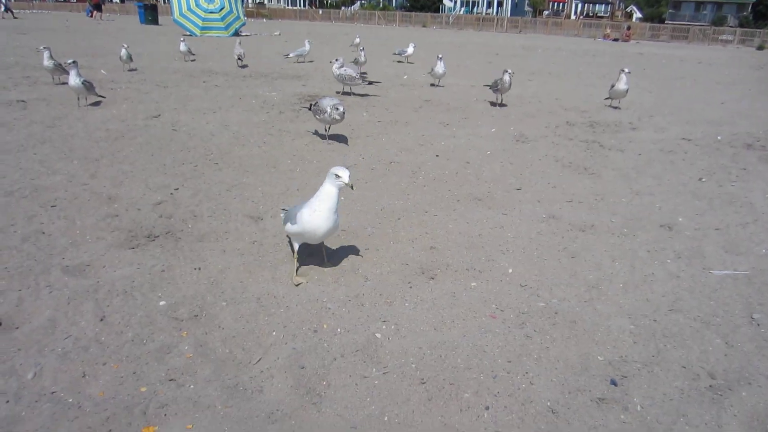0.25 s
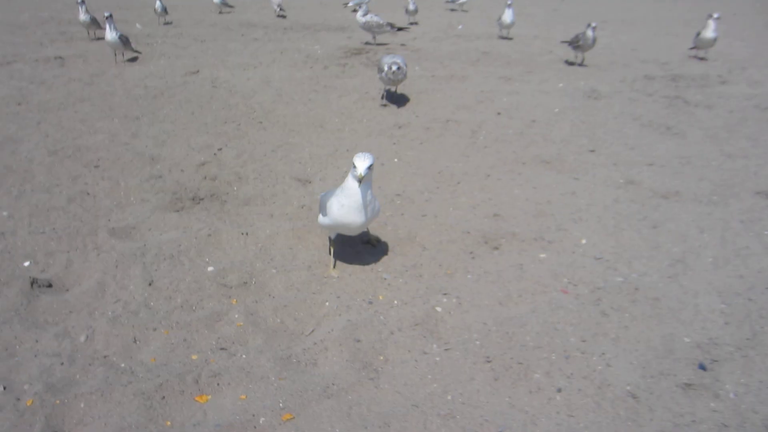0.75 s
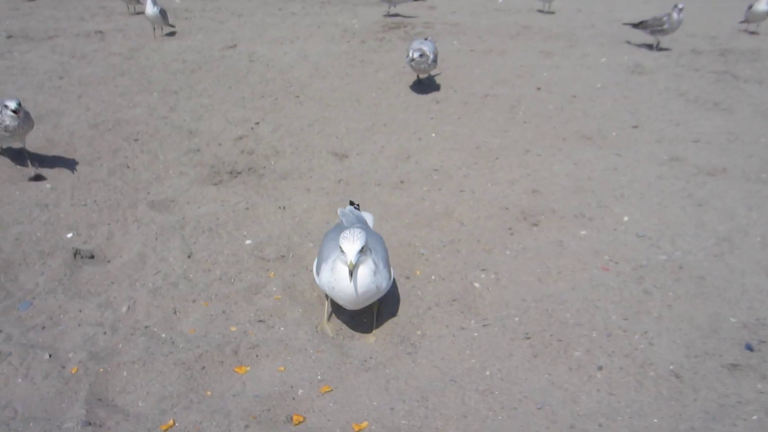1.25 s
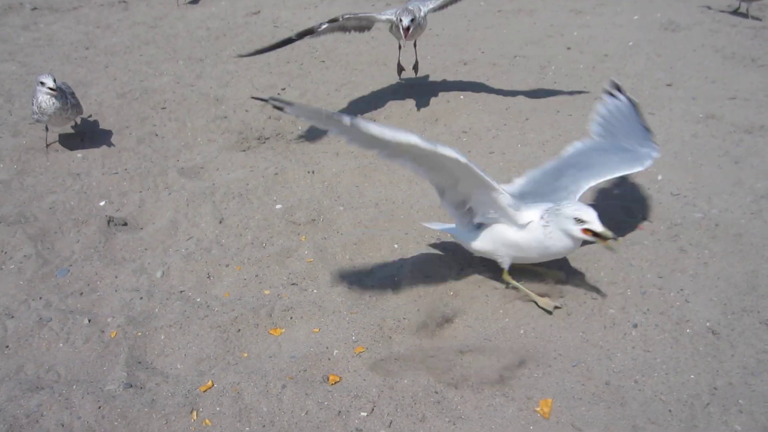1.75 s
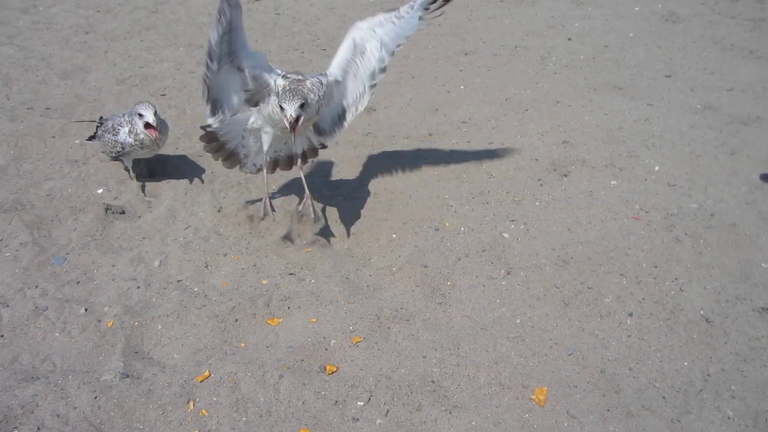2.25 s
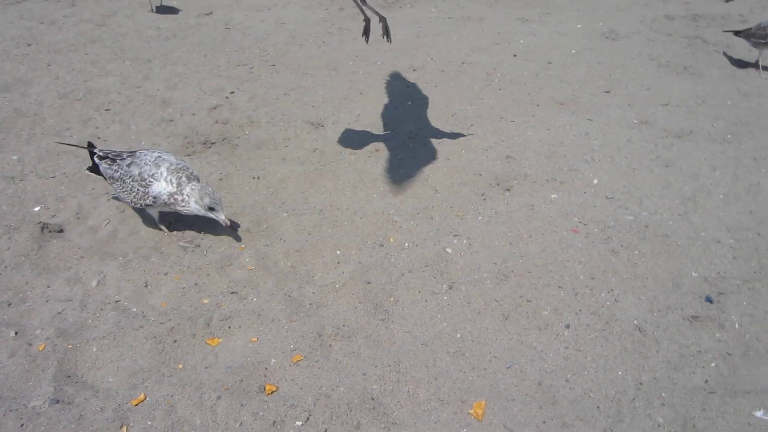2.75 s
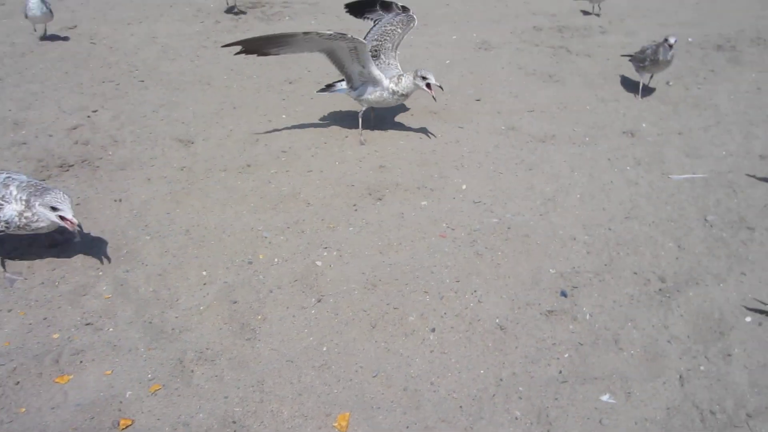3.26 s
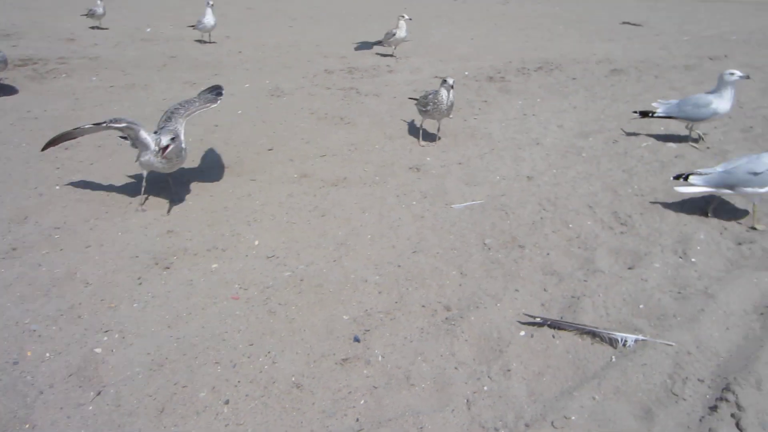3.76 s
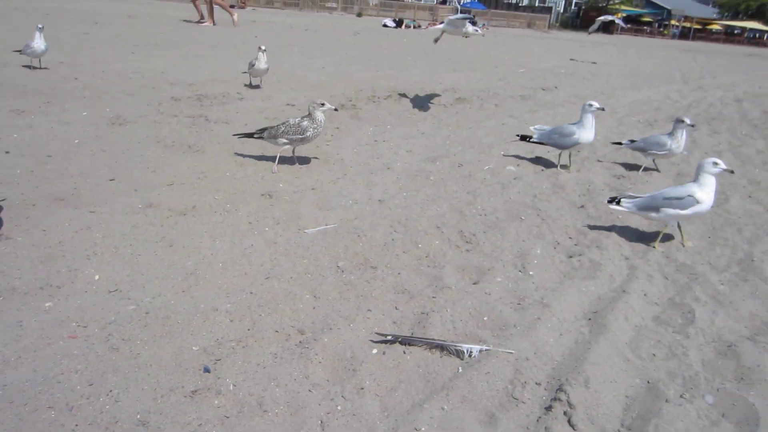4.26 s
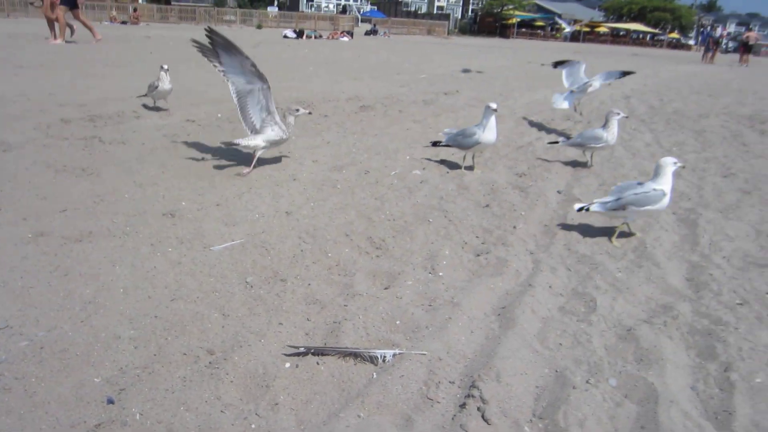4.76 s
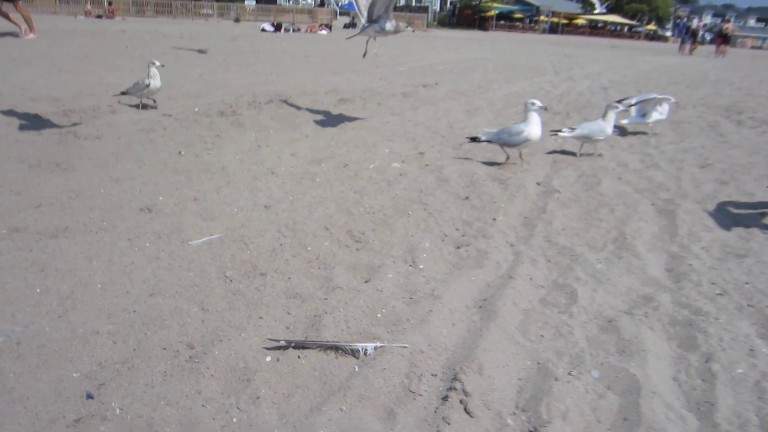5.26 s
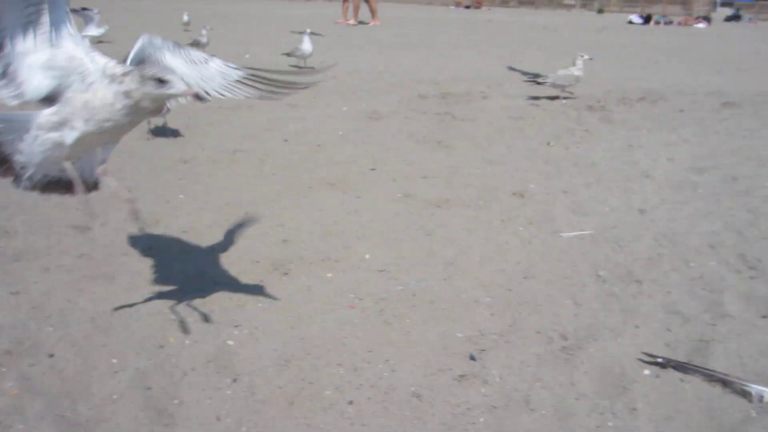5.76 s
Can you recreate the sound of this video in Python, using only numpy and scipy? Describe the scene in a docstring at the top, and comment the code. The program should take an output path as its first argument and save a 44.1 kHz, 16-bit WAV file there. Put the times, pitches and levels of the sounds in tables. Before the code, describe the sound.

Piercing, overlapping gull cries and raspy cackles grow louder over wind buffeting, a faint beach wash and a few sharp ticks.

```python
"""Wind thumps and flutters on the microphone over a faint beach wash, while gulls squabble close by.
Their thin squeals are two whistling membranes that crack between registers, often in overlapping cries.
Harsh rasps are uneven slaps and puffs of air through a throat colour; the wind is lumpy filtered noise.
A few sharp ticks, short decaying noise bursts, fall among the cries."""
import sys
import numpy as np
from scipy import signal
from scipy.fft import rfft, irfft, next_fast_len
from scipy.io import wavfile
from scipy.ndimage import uniform_filter1d

SR = 44100
rng = np.random.default_rng(int(sys.argv[2]) if len(sys.argv) > 2 else 0)


def store_wav(level_fs):
    """Save 16-bit WAV to argv[1]."""
    pcm = np.round(np.clip(np.atleast_2d(level_fs), -1, 1) * 32767)
    wavfile.write(sys.argv[1], SR, pcm.T.astype(np.int16))


N = 265261
TIME = np.arange(N) / SR  # s

# Levels in the tables are relative: each layer has its own trim. Left-right is positive towards the left.
# colour of the low and the middle part of the wind: (frequency [Hz], level [dB])
RUMBLE_COLOUR = [(8.8, -26), (15, -15), (70, -1.5), (135, -1), (193, -1.5), (300, -8.5), (390, -23),
                 (660, -120)]
FLUTTER_COLOUR = [(100, -48.5), (220, -11), (330, 3.5), (450, -0.5), (700, -8.5), (1000, -16.5),
                  (1600, -32), (3000, -45), (8000, -73)]
# the breeze between gusts: (time [s], level [dB])
BREEZE = [(0, -22), (.9, -24), (1.2, -28), (2.3, -24), (2.75, -42), (3.2, -33), (3.5, -41), (3.7, -50),
          (3.95, -36), (4.3, -36), (4.7, -30), (5.38, -39), (5.6, -26), (6, -21)]
# separate gusts on the microphone: (time [s], half width [s], rumble level [dB], flutter level [dB])
GUSTS = [(.01, .03, -24, -21), (.165, .04, -15, -21), (.285, .025, -14, -27), (.58, .06, -14, -22),
         (.69, .04, -14, -21), (.85, .025, -16, -26), (.98, .04, -17, -30), (1.41, .035, -12, -30),
         (1.89, .06, -16, -20), (2.01, .05, -20, -27), (2.15, .07, -22, -32), (2.62, .035, -23, -27),
         (2.92, .04, -25, -37), (3.16, .04, -21, -31), (3.375, .012, -21, -36), (3.795, .03, -20, -23),
         (4.11, .035, -21, -30), (4.46, .03, -20, -36), (4.59, .02, -24, -42), (4.79, .06, -19, -24),
         (5.21, .05, -22, -26), (5.51, .04, -23, -31), (5.66, .045, -16, -15), (5.85, .05, -15, -20)]
# pressure thumps of wind: (time [s], peak level [dB], push time [ms], left-right [dB])
BUFFETS = [(.016, -16, .5, -6), (.128, -11, .5, -6), (.168, -15, .5, -6), (.286, -14, 3.5, -6),
           (.447, -15, .5, -6), (.577, -11, .6, -6), (.607, -13, .7, -6), (.661, -17, .4, -6),
           (.702, -15, .6, -6), (.86, -16, .6, -6), (1.405, -7, 1.6, -6), (1.876, -2, .5, -5),
           (1.998, -9, .5, -6), (3.381, -7, 1.1, 4), (3.818, -14, .5, 4), (4.115, -17, .5, 2),
           (4.389, -8, .5, -6), (4.971, -10, .5, -1), (5.168, -8, .6, -3), (5.644, -8, .45, -2),
           (5.678, -8, .6, 0), (5.842, -11, .5, -3), (5.87, -11, .5, -6)]
# colour of the beach wash: (frequency [Hz], level [dB])
BEACH_COLOUR = [(30, -12.5), (150, 2.5), (400, -0.5), (1000, -13), (2500, -18.5), (4000, -30.5),
                (6500, -31.5), (9000, -42.5), (12000, -64.5), (16000, -73.5)]
# harsh stretches, where the membranes slap shut: (start [s], end [s], slap rate [per s], unevenness [0-1],
# first level [dB], last level [dB], left-right [dB], throat opening [0-1])
RASPS = [(0, .26, 330, .8, -49, -53, -7, .15), (.56, 1.03, 330, .8, -44, -46, -9, .15),
         (1.03, 1.17, 530, .3, -39, -40, -10, 1), (1.17, 1.33, 515, .12, -44, -53, -10, .9),
         (2.05, 2.21, 300, .7, -42, -39, -12, .6), (2.21, 2.44, 420, .3, -32, -33, -13, 1),
         (2.44, 2.61, 330, .5, -38, -44, -13, 1), (2.645, 2.7, 640, .12, -44, -46, -12, .7),
         (2.92, 2.985, 460, .3, -42, -45, -14, .8), (3.14, 3.44, 330, .5, -51, -49, -14, .3),
         (3.65, 3.76, 340, .2, -53, -49, 0, .2), (3.76, 3.81, 410, .25, -47, -43, 3, .8),
         (4.373, 4.44, 330, .3, -36, -33, 4, 1), (4.44, 4.52, 300, .5, -33, -35, 4, 1),
         (4.52, 4.77, 300, .5, -40, -36, 3, .7), (4.77, 4.865, 330, .45, -30, -26, 4, 1),
         (5.155, 5.188, 378, .15, -28, -24, 2, 1), (5.22, 5.245, 330, .7, -40, -52, 4, .7),
         (5.29, 5.4, 330, .6, -47, -54, 4, .3)]
# throat colour of the rasp at full cry, and half closed: (frequency [Hz], level [dB])
OPEN_THROAT = [(500, -24), (1000, -11), (1450, -30), (2050, -7), (2700, 2.5), (4100, -8.5), (5500, 1),
               (7000, -19.5), (8000, -14.5), (9500, -47.5), (11800, -54), (16000, -46)]
SOFT_THROAT = [(700, -17.5), (1600, -11), (2200, 6), (3000, -11), (4200, -32.5), (5600, -16.5),
               (7500, -9.5), (10000, -37), (16000, -39.5)]
# placing and timbre by voice name: (left-right [dB], left lead [ms], overtone strength [dB],
# second membrane's pitch [share of the first], second membrane's level [dB]);
# the key "far" stands for a side tone: a thin, mostly high tone sounding along with the cries
VOICES = {"thin": (-6.5, .112, 0, .56, -17), "stammer": (-8, .16, -1, .72, -22),
          "squawk": (-7, .18, 8.5, .5, -4), "lead": (-9, .16, 1, .75, -38),
          "cackle": (-8.5, .18, 4, .56, -20.5), "whistle": (-10.5, .076, 6, .5, -32),
          "answer": (-8, .19, 4, .7, -24), "long": (-2, .023, 4.5, .58, -27),
          "under": (-2, .018, 7.5, .6, -30), "scream": (-.5, .01, -1, .7, -19),
          "torn": (-5.5, .025, 2.5, .55, -11.5), "wail": (-1.5, .035, -2, .62, -38),
          "steady": (-7.5, -.02, 5, .5, -20), "loud": (-2, .033, 0, .55, -35),
          "trailing": (-1, 0, 3.5, .52, -17), "mew": (-1, 0, 5.5, .76, -26), "far": (-6, .1, 0, .5, -25)}
# held notes of the high register: (voice [name], start [s], end [s], first, middle and last pitch [Hz],
# first level [dB], last level [dB], roughness [0-1], warble [0-1]); "far" is the side tone here too
SQUEALS = [("thin", .003, .279, 3530, 3490, 3460, -45, -47, .02, 0),
           ("stammer", .535, .595, 3280, 3380, 3250, -35, -39, .2, 0),
           ("stammer", .595, .73, 4200, 4050, 3900, -64, -50, .2, 0),
           ("stammer", .73, 1.008, 3900, 3780, 3680, -38, -38, .08, .4),
           ("squawk", 1.02, 1.26, 2150, 2140, 2000, -37, -36, .2, 0),
           ("squawk", 1.26, 1.37, 2100, 1900, 1520, -41, -54, .35, 0),
           ("lead", 1.683, 1.868, 3540, 3170, 3350, -22, -18, .02, 0),
           ("lead", 1.868, 1.989, 4350, 4400, 4660, -28, -26, .05, 0),
           ("lead", 1.989, 2.16, 3540, 3350, 3720, -22, -19, .05, .3),
           ("cackle", 2.044, 2.574, 3920, 4020, 3960, -24, -27, .24, .7),
           ("lead", 2.16, 2.204, 3810, 3830, 3900, -19, -18, .02, 0),
           ("whistle", 2.769, 2.829, 3380, 3320, 3400, -35, -32, .03, 0),
           ("whistle", 2.829, 2.993, 4335, 4290, 4260, -26, -23, .03, 0),
           ("answer", 2.99, 3.13, 3350, 3600, 3390, -32, -30, .03, 0),
           ("whistle", 2.993, 3.148, 4240, 4100, 4040, -22.5, -25, .03, 1),
           ("far", 3.1, 3.43, 4780, 4830, 4720, -40, -47, .05, 0),
           ("answer", 3.13, 3.438, 3390, 3450, 3240, -26, -25, .03, .15),
           ("whistle", 3.148, 3.215, 3170, 3090, 2930, -23, -32, .03, 0),
           ("far", 3.43, 3.55, 3800, 3760, 3800, -52, -56, .05, .3),
           ("long", 3.526, 3.645, 3370, 3190, 3110, -43, -42, .04, 0),
           ("long", 3.645, 3.83, 3290, 3300, 3340, -37, -36, .05, 0),
           ("under", 3.81, 3.977, 3000, 3150, 3200, -35, -37, .02, 0),
           ("long", 3.83, 3.98, 3190, 3330, 3330, -36, -32, .04, 0),
           ("long", 3.98, 4.066, 3260, 3255, 3275, -37, -38, .04, 0),
           ("long", 4.066, 4.173, 4335, 4305, 4290, -29, -33, .03, 0),
           ("long", 4.173, 4.19, 3280, 3150, 3100, -33, -25, .03, 0),
           ("scream", 4.433, 4.52, 3170, 3020, 3130, -20, -19, .07, 0),
           ("torn", 4.514, 4.829, 4130, 4060, 3900, -28, -28, .23, .4),
           ("wail", 4.51, 4.767, 3610, 3600, 3700, -32, -33, .14, .2),
           ("scream", 4.52, 4.606, 3170, 3280, 3230, -25, -25, .15, 0),
           ("wail", 4.767, 4.805, 3080, 2830, 2500, -19, -28, .3, 0),
           ("wail", 4.848, 4.92, 3030, 3125, 3110, -16, -17.5, .03, 0),
           ("steady", 4.86, 5.155, 3940, 3860, 3735, -45, -39, .05, 0),
           ("wail", 4.92, 5.018, 3130, 3350, 3290, -22, -24, .03, 0),
           ("loud", 5.22, 5.31, 3305, 3345, 3325, -15, -16, .02, 0),
           ("far", 5.293, 5.324, 2720, 2680, 2660, -33, -34, .08, 0),
           ("loud", 5.31, 5.406, 3310, 3295, 3300, -17, -25, .06, 0),
           ("trailing", 5.425, 5.618, 3360, 3460, 3350, -38, -43, .04, 0),
           ("trailing", 5.683, 5.754, 3410, 3390, 3360, -46, -45, .02, 0)]
# cracks down into the low register: (voice [name], start [s], end [s], pitch [Hz], glide [octaves],
# level [dB], roughness [0-1])
YELPS = [("thin", .279, .3, 2280, -.05, -50, .2), ("stammer", .518, .535, 2340, .2, -33, .05),
         ("stammer", .848, .868, 2620, .06, -31, .1), ("stammer", .9, .919, 2490, -.04, -28, .12),
         ("stammer", .956, .978, 2440, .03, -28, .12), ("stammer", 1.008, 1.032, 2440, -.05, -28, .08),
         ("stammer", 1.045, 1.085, 2480, -.28, -31, .35), ("stammer", 1.11, 1.18, 2400, -.12, -26, .17),
         ("lead", 1.665, 1.683, 2100, .25, -37, .25), ("cackle", 2.002, 2.03, 2170, .17, -26, .08),
         ("lead", 2.204, 2.225, 2450, -.35, -20, .2), ("lead", 2.225, 2.285, 1860, .03, -26, .3),
         ("lead", 2.295, 2.35, 1950, .03, -25, .3), ("cackle", 2.362, 2.38, 2350, -.15, -21, .3),
         ("lead", 2.38, 2.44, 2060, .03, -26, .2), ("cackle", 2.414, 2.436, 2550, -.35, -21, .4),
         ("lead", 2.44, 2.515, 1880, -.15, -33, .2), ("cackle", 2.47, 2.487, 2230, -.06, -21, .25),
         ("cackle", 2.522, 2.539, 2190, .03, -21, .25), ("cackle", 2.574, 2.592, 2170, .08, -21, .22),
         ("cackle", 2.595, 2.64, 2090, -.24, -39, .3), ("whistle", 2.703, 2.769, 2340, .05, -32, .04),
         ("answer", 2.935, 2.99, 1820, -.05, -31, .2), ("answer", 3.438, 3.456, 2000, -.55, -39, .4),
         ("long", 3.505, 3.526, 2230, .04, -48, .2), ("under", 3.778, 3.81, 1655, .03, -31, .4),
         ("under", 3.977, 4.005, 1820, -.14, -33, .45), ("long", 4.19, 4.206, 1530, -.16, -30, .2),
         ("scream", 4.395, 4.433, 2440, .08, -25, .25), ("torn", 4.47, 4.514, 2220, .24, -31, .3),
         ("scream", 4.606, 4.621, 1630, -.22, -36, .2), ("torn", 4.829, 4.855, 1910, .05, -25, .35),
         ("wail", 4.829, 4.848, 2350, .2, -23, .3), ("wail", 5.018, 5.03, 1630, -.22, -31, .25),
         ("loud", 5.188, 5.22, 1915, .13, -15.5, .04), ("loud", 5.406, 5.424, 1660, -.07, -24, .35),
         ("mew", 5.619, 5.683, 2430, .03, -35, .18), ("mew", 5.754, 5.85, 2400, .04, -43, .04),
         ("mew", 5.85, 5.955, 2370, -.09, -44, .08)]
# the throat favours the octave of low notes: (pitch [Hz], octave overtone level [dB])
OCTAVE = [(1600, -12.5), (2300, -14), (3200, -20.5), (4200, -22)]
# what the open bill lets out of a squeal: (frequency [Hz], level [dB])
BILL = [(600, -35), (1050, -11), (1500, 3), (7500, -1.5), (9000, -3.5), (11500, -21.5), (16000, -28.5)]
# small sharp ticks: (time [s], level [dB])
TICKS = [(.144, -28), (.321, -14), (.334, -35), (.397, -38), (.434, -35), (.471, -29), (.502, -33),
         (1.578, -33), (3.383, -5), (4.97, -20)]
# colour of the ticks: (frequency [Hz], level [dB])
TICK_COLOUR = [(300, 16), (1200, -8.5), (2300, 0), (4000, -21.5), (7000, -21), (11000, -39), (16000, -57)]

BREEZE_FLUTTER_DB = -13  # against the breeze's rumble
RASP_ATTACK_S, RASP_RELEASE_S = .002, .012
YELP_RASP_DB, YELP_SLAPS_HZ, YELP_UNEVEN = -3, 400, .2  # the rattle that comes with a rough yelp
DROOP, ROUGH_DROOP, DROOP_S = .04, .55, .008  # share by which pitch sags before a crack, more when rough
SCOOP, SCOOP_S = .06, .003  # a yelp lands from above by this share of its pitch
YELP_DIP = .025  # bend of a yelp's pitch towards its middle, as a share
SQUEAL_SWELL_DB, YELP_SWELL_DB, YELP_FADE_DB = 1.5, 3, -3
WARBLE_HZ, WARBLE_DEPTH = 21, .024  # depth as a share of pitch
EDGE_HZ = 15800  # upper band limit


def amp(db):
    """Turns decibels into gain."""
    return 10 ** (np.asarray(db) / 20)


def unit(x):
    """Scales a signal to rms 1."""
    return x / np.sqrt(np.mean(x ** 2) + 1e-20)


def follow(rows, t=TIME):
    """Reads a two-column curve at the points t."""
    x, y = np.transpose(rows)
    return np.interp(t, x, y)


def colour(x, points):
    """Filters by a level curve drawn over log frequency."""
    hz, db = np.transpose(points)
    size = next_fast_len(x.shape[-1])
    f = np.fft.rfftfreq(size, 1 / SR)
    gain = amp(np.interp(np.log(f + 1), np.log(hz + 1), db))
    return irfft(rfft(x, size) * gain, size)[..., :x.shape[-1]]


def wander(count, hz):
    """Smooth random motion of rms 1: noise low-passed at hz."""
    sos = signal.butter(2, min(hz, SR / 3), fs=SR, output="sos")
    return unit(signal.sosfilt(sos, rng.standard_normal(count + 4096))[-count:])


def sides(db):
    """Left and right gains of mean power 1."""
    g = amp(np.array([db, -db]).reshape(2, -1) / 2)
    return g / np.sqrt((g ** 2).mean(0))


def add(mix, s, sound):
    """Lays a sound into the mix from s seconds, cut at the end."""
    part = mix[..., max(round(s * SR), 0):][..., :sound.shape[-1]]
    part += sound[..., :part.shape[-1]]


def eddies(spectrum, lumps_db):
    """Lumpy turbulence that pushes the two channels mostly in opposite directions."""
    push, common = colour(rng.standard_normal((2, N)) * amp(lumps_db), spectrum)
    pair = np.array([.2 * common + push, .2 * common - .75 * push])
    # even out the slow level so that the gusts set it
    return pair / np.sqrt(uniform_filter1d((pair ** 2).mean(0), size=3500) + 1e-12)


def wind(rumble_db=.7, flutter_db=.7, buffet_db=1, side_db=-5.5):
    """Gusts ride on the breeze; rumble and flutter share the same lumps, with single pressure thumps on top."""
    low_power = amp(follow(BREEZE)) ** 2
    high_power = low_power * amp(BREEZE_FLUTTER_DB) ** 2
    for s, width, low_db, high_db in GUSTS:
        swell = np.exp(-((TIME - s) / width) ** 2)
        low_power = low_power + swell * amp(low_db) ** 2
        high_power = high_power + swell * amp(high_db) ** 2
    lumps = np.minimum(wander(N, 55), 1.6)
    rumble = eddies(RUMBLE_COLOUR, 5 * lumps) * np.sqrt(low_power) * amp(rumble_db)
    flutter = eddies(FLUTTER_COLOUR, 7 * lumps) * np.sqrt(high_power) * amp(flutter_db)
    out = (rumble + flutter) * sides(side_db)
    for s, db, push_ms, place_db in BUFFETS:
        u = np.arange(-1500, 1500) / SR * 1000 / push_ms  # time in pushes
        push = u * np.exp((1 - u ** 2) / 2)  # a swing one way, then the other
        grit = 0.1 * wander(len(u), 530) * np.exp(-abs(u) / 9)
        opposed = np.array([[1], [-.8]])
        add(out, s - 1500 / SR, amp(db + buffet_db) * (push + grit) * opposed * sides(place_db))
    return out


def beach(level_db=-53.5):
    """A smooth far wash of surf and breeze, made of steady coloured noise."""
    return amp(level_db) * unit(colour(rng.standard_normal((2, N)), BEACH_COLOUR))


def rasp(start, end, slap_hz, uneven, first_db, last_db, side_db, opening,
         lead_ms=0.069, puff_db=0, flutter_db=2.5):
    """The membranes slap shut in an uneven rattle; each slap and its puff of air ring the throat."""
    t = np.arange(0, end - start + RASP_RELEASE_S, 1 / SR)
    count = len(t)
    db = np.interp(t, [0, end - start], [first_db, last_db]) + flutter_db * uneven * wander(count, 70)
    turns = np.cumsum(slap_hz * (1 + .16 * uneven * wander(count, 90))) / SR
    # one click for each whole turn, of uneven strength
    slaps = np.diff(np.floor(turns), prepend=-1) * np.exp(.4 * uneven * wander(count, 200))
    puffs = (.25 + np.exp(-(turns % 1) / .25)) * rng.standard_normal(count)
    drive = unit(slaps) + amp(puff_db) * np.sqrt(uneven) * unit(puffs)
    fade = np.clip(np.minimum(t / RASP_ATTACK_S, (t[-1] - t) / RASP_RELEASE_S), 0, 1)
    wide = opening * unit(colour(drive, OPEN_THROAT))
    narrow = (1 - opening) * unit(colour(drive, SOFT_THROAT))
    voice = (wide + narrow) * fade * amp(db)
    late = np.interp(t - lead_ms / 1000, t, voice)  # the right side trails
    return start, np.array([voice, late]) * sides(side_db)


def rasps():
    """The harsh stretches, and a short rattle on each yelp in step with its roughness."""
    out = np.zeros((2, N))
    for row in RASPS:
        add(out, *rasp(*row))
    for name, start, end, _, _, db, rough in YELPS:
        side_db = VOICES[name][0]
        s, rattle = rasp(start, end, YELP_SLAPS_HZ, YELP_UNEVEN, db, db + YELP_FADE_DB, side_db, 1)
        add(out, s, amp(YELP_RASP_DB) * rough * rattle)
    return out


def gesture(name):
    """Times, pitch, strength and roughness of one voice: squeals bend in one arc, sag, and give way to yelps."""
    squeals, yelps = ([row[1:] for row in table if row[0] == name] for table in (SQUEALS, YELPS))
    begin = min(row[0] for row in squeals + yelps) - .003
    finish = max(row[1] for row in squeals + yelps) + .003
    t = np.arange(begin, finish, 1 / SR)
    hz, gain, rough = np.zeros((3, len(t)))
    for start, end, first, middle, last, first_db, last_db, roughness, warble in squeals:
        on = (t >= start) & (t < end)
        u = (t[on] - start) / (end - start)
        arch = 4 * u * (1 - u)
        hz[on] = first + (last - first) * u + (middle - (first + last) / 2) * arch
        hz[on] *= 1 - WARBLE_DEPTH * warble * np.sin(2 * np.pi * WARBLE_HZ * (t[on] - start))
        gain[on] = amp(first_db + (last_db - first_db) * u + SQUEAL_SWELL_DB * (arch - .5))
        rough[on] = roughness
    for start, *_ in yelps:
        sag = (DROOP + ROUGH_DROOP * rough) * np.exp(-abs(start - t) / DROOP_S)
        hz *= 1 - sag * (t < start)
    for start, end, pitch, glide, db, roughness in yelps:
        on = (t >= start) & (t < end)
        u = (t[on] - start) / (end - start)
        hump = np.sin(np.pi * u) - .5
        scoop = 1 + SCOOP * np.exp((start - t[on]) / SCOOP_S)
        hz[on] = pitch * (1 - YELP_DIP * hump) * 2 ** (glide * (u - .5)) * scoop
        gain[on] = amp(db + YELP_FADE_DB * (u - .5) + YELP_SWELL_DB * hump)
        rough[on] = roughness
    hz = np.interp(t, t[hz > 0], hz[hz > 0])  # bridge the silent gaps
    return t, *uniform_filter1d(np.array([hz, gain, rough]), size=130, axis=1)


def cry(name, side_db, lead_ms, bright_db, second, second_db, jitter=0.054, tremor=.003, shimmer=1.0,
        rattle_hz=190, rattle=0.62, rough_db=2.5, third_db=-7, fourth_db=-16, mix_db=-2, harsh_db=6,
        waver_db=.8):
    """Two whistling membranes share one air stream; when rough, they rattle and their pitch shakes."""
    t, hz, gain, rough = gesture(name)
    count = len(t)
    # the tone drops out as the register cracks
    crack_speed = np.gradient(np.log(hz)) * SR / 60
    holding = uniform_filter1d(1 / (1 + crack_speed ** 2), size=100)
    octave = amp(follow(OCTAVE, hz) + bright_db + harsh_db * rough)
    beat = np.cos(2 * np.pi * np.cumsum(rattle_hz * (1 + 0.22 * wander(count, 73.7))) / SR)
    hz = hz * (1 + tremor * wander(count, 70) + jitter * rough * (wander(count, 370) + beat))
    shake = unit(np.exp(rough * (shimmer * wander(count, 370) + rattle * beat)))
    level = gain * amp(rough_db * rough + waver_db * wander(count, 30)) * holding * shake
    lag = np.array([[0], [1]]) * hz * lead_ms / 1000  # cycles by which the right side trails
    phase = 2 * np.pi * (np.cumsum(hz) / SR - lag)
    overtones = np.sin(2 * phase)
    for k, k_db in ((3, third_db), (4, fourth_db)):
        treble_loss = (1 + (k * hz / 8500) ** 8) ** .5
        overtones += amp(k_db) / treble_loss * np.sin(k * phase)
    # the weaker membrane adds its own tone and sum and difference tones
    low = second * phase
    pair = np.sin(low) + amp(mix_db - 0.5) * np.sin(2 * phase - low)
    pair = pair + amp(mix_db - 2.5) * np.sin(phase + low) + 0.81 * octave * np.sin(2 * phase + low)
    pair_gain = amp(second_db + 5 * np.clip(wander(count, 14), -2, 1))
    voice = np.sin(phase) + octave * overtones + pair_gain * pair
    return t[0], np.sqrt(2) * level * voice * sides(side_db)


def cries(level_db=-1):
    """All the squeals, yelps and side tones, each voice from its own place, coloured by the open bill."""
    out = np.zeros((2, N))
    for name, voice in VOICES.items():
        add(out, *cry(name, *voice))
    return amp(level_db) * colour(out, BILL)


def open_air(x, wet_db=-31):
    """Faint, short scatter from the sand: a decaying noise tail."""
    t = np.arange(SR // 2) / SR
    # falls 60 dB in 0.3 s, after a 4 ms gap
    tail = rng.standard_normal((2, len(t))) * amp(-60 * t / .3) * (t > .004)
    return amp(wet_db) * signal.fftconvolve(x, tail / np.linalg.norm(tail[0]), axes=1)[:, :N]


def ticks(decay_s=0.0024):
    """Short dry cracks without a ring: noise that dies away at once."""
    out, t = np.zeros(N), np.arange(1000) / SR
    for s, db in TICKS:
        add(out, s, amp(db) * rng.standard_normal(len(t)) * np.exp(-t / decay_s))
    return colour(out, TICK_COLOUR) * sides(-9)


def scene():
    """Wind on the microphone, the far wash, gulls in the open air and ticks."""
    gulls = rasps() + cries()
    return wind() + beach() + gulls + open_air(gulls) + ticks()


def record(dry):
    """Full-scale limit, then the band limit."""
    edge = signal.firwin(511, EDGE_HZ, window=("kaiser", 9), fs=SR)
    return signal.oaconvolve(np.clip(dry, -1, 1), edge[None], "same", axes=1)


dry = scene()
out = record(dry)
store_wav(out)
```